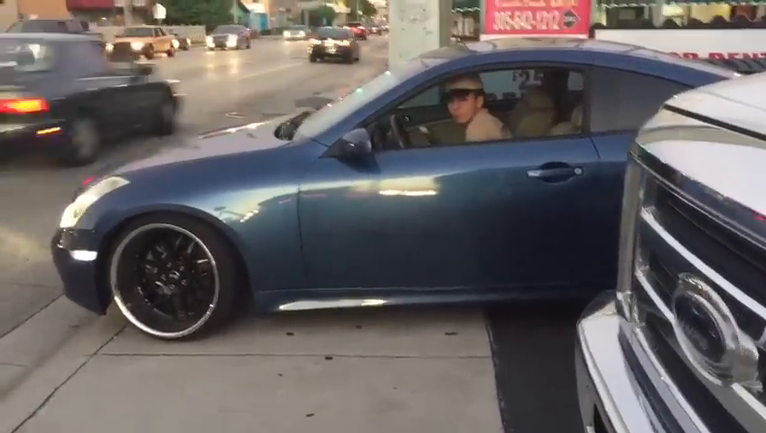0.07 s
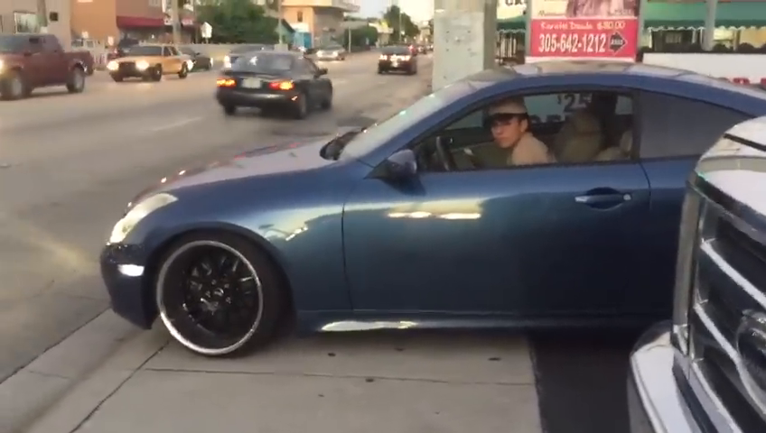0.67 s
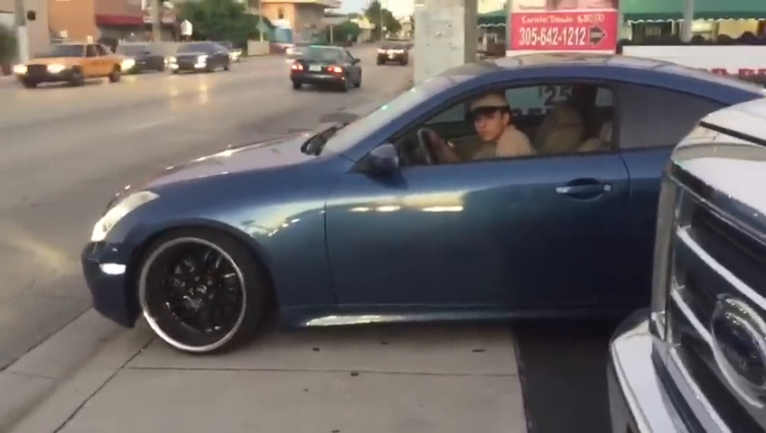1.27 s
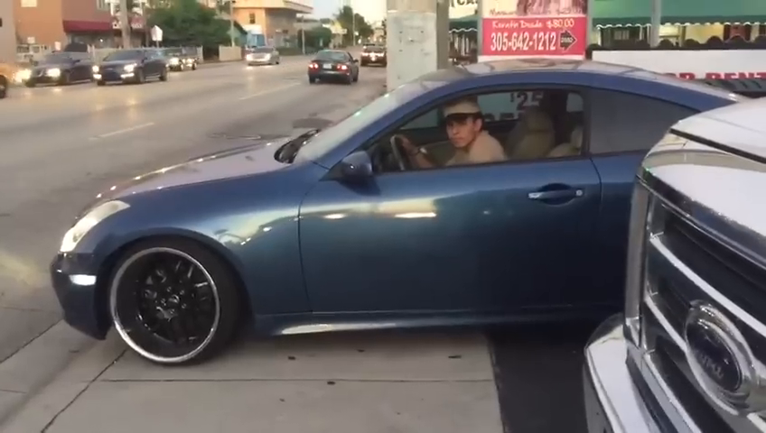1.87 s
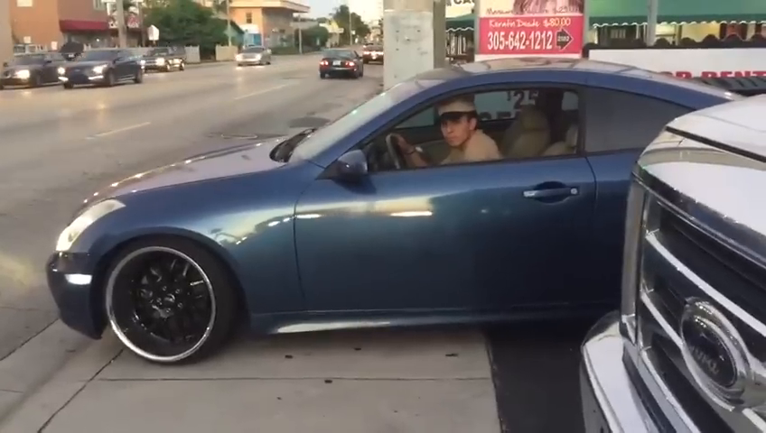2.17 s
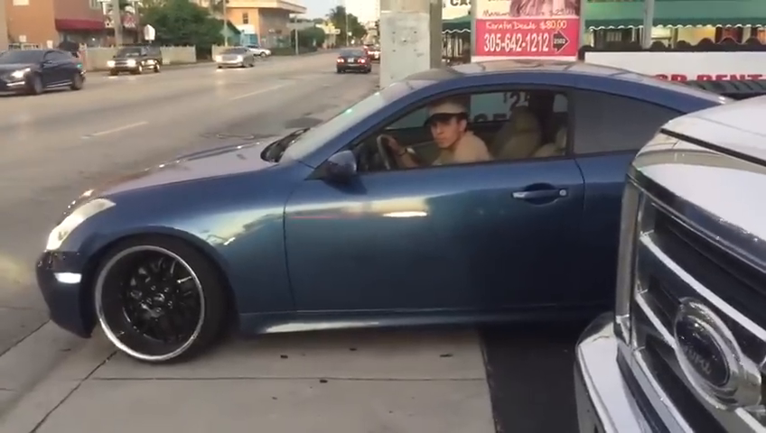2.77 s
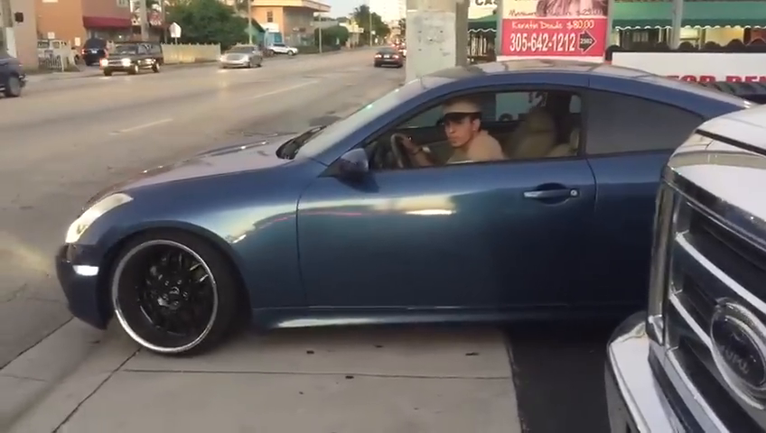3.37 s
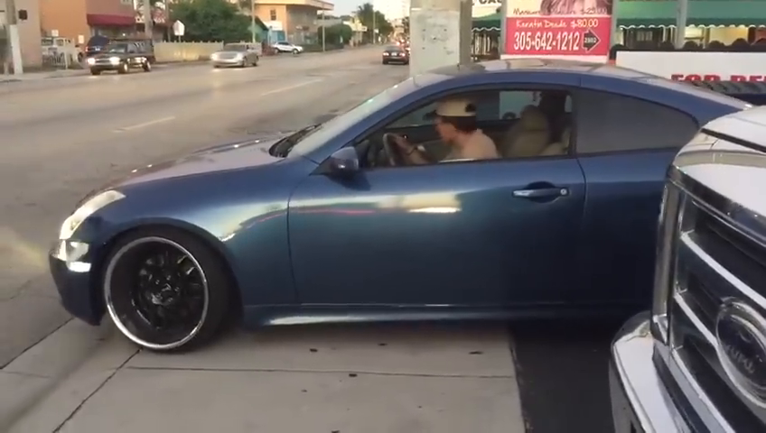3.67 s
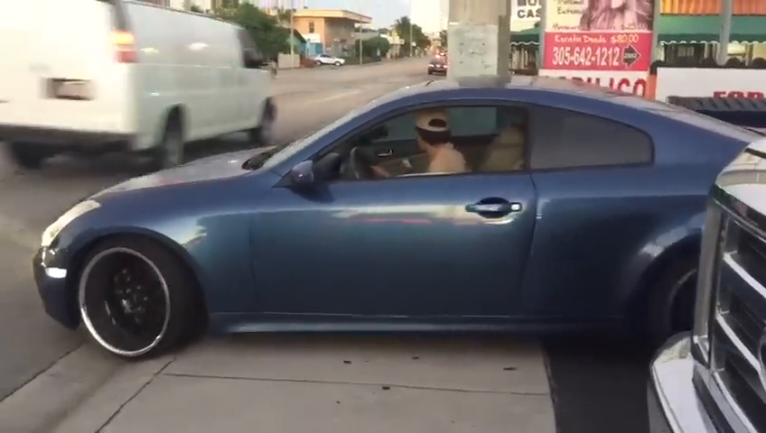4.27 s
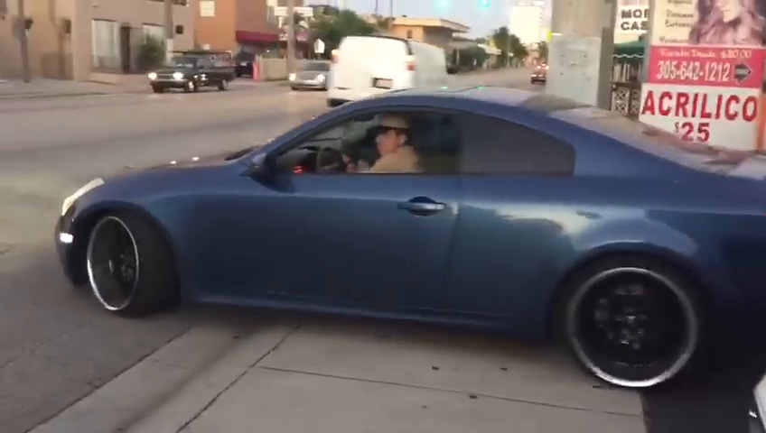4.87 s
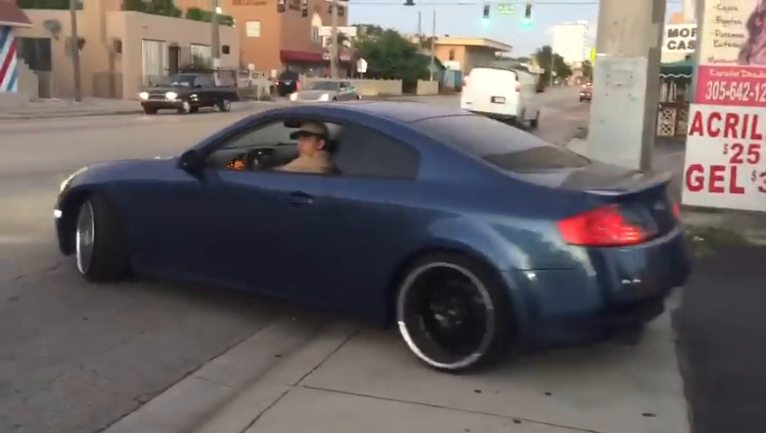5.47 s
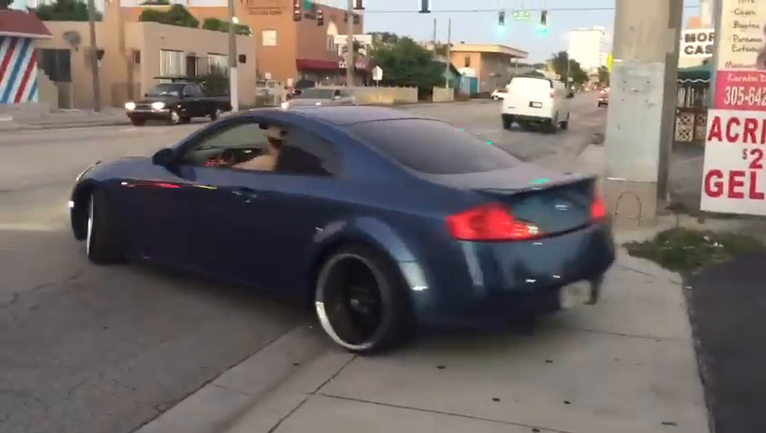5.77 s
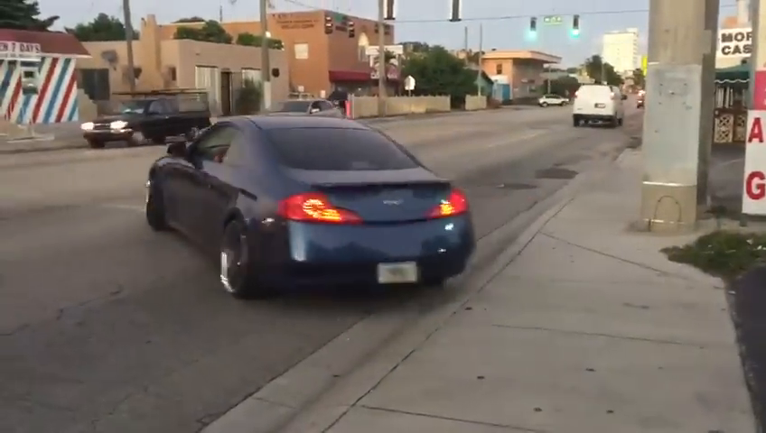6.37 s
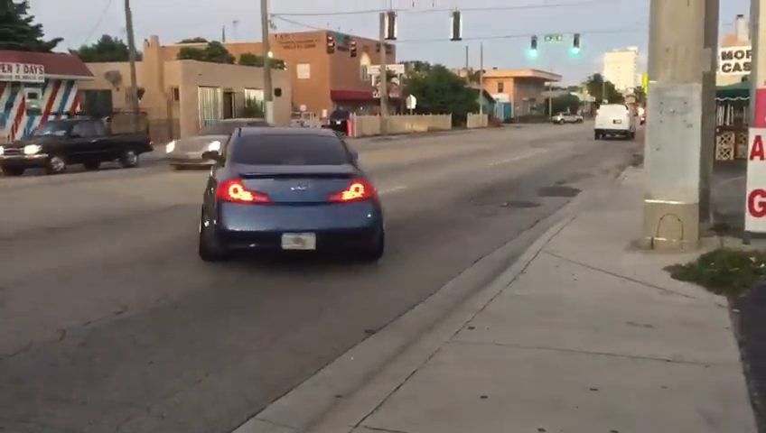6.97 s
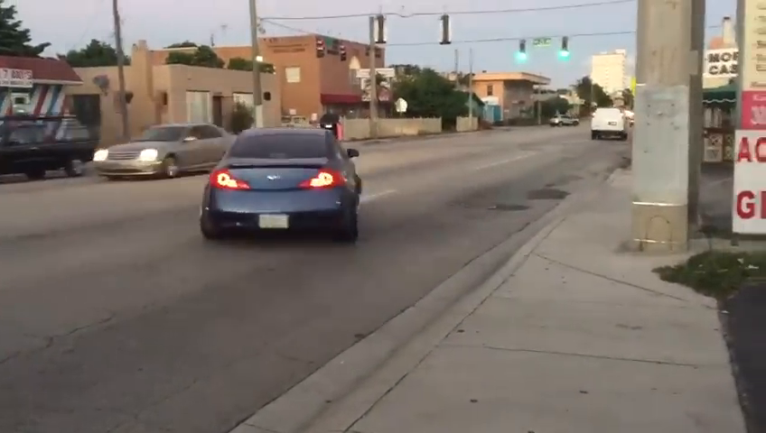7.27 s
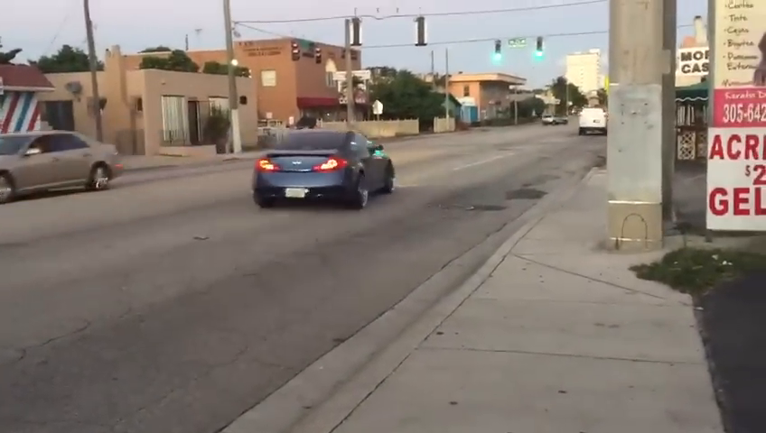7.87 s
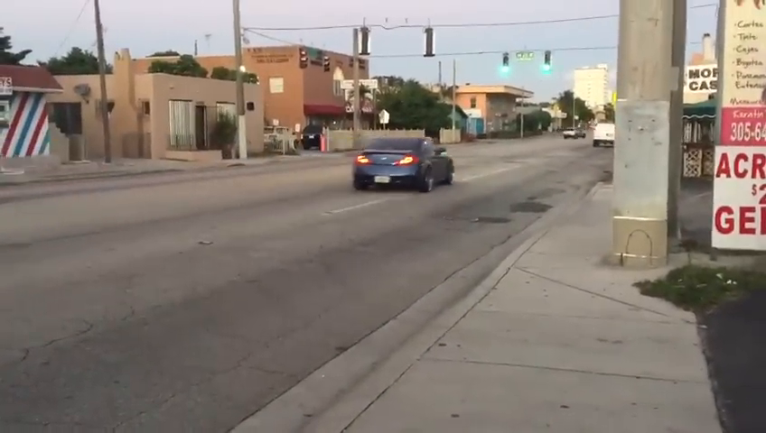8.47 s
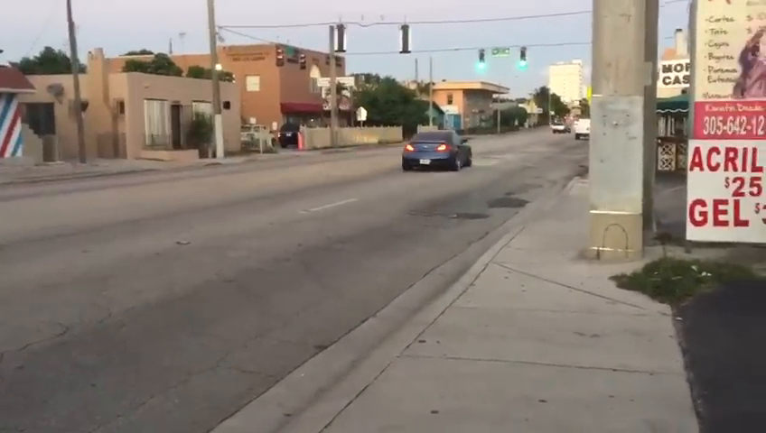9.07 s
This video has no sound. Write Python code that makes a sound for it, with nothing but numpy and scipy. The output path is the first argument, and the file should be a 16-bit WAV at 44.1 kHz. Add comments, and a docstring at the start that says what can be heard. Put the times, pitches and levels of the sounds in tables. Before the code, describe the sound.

A coupe idles low amid passing traffic, revs twice, then pulls away with a loud raspy exhaust roar and short tyre chirps.

```python
"""At the kerb of a busy street, a six-cylinder coupe with a sports exhaust idles as a car and a van pass.
It creeps out on two blips of the throttle, loose metal jingles, and it pulls away hard with chirping tyres.
Each firing of a cylinder sends one pulse down the exhaust; together the pulses make a deep drone.
Under load they steepen into shocks (sudden jumps in pressure) that rasp and echo off the house fronts."""
import sys
import numpy as np
from scipy import signal
from scipy.fft import rfft, irfft
from scipy.io import wavfile
from scipy.ndimage import uniform_filter1d, map_coordinates

SR = 44100
rng = np.random.default_rng(int(sys.argv[2]) if len(sys.argv) > 2 else 0)


def dump(signal):
    """Clip the signal to [-1, 1] and save it as 16-bit WAV at the path in sys.argv[1]."""
    limited = np.clip(np.atleast_2d(signal).T, -1, 1)
    pcm = np.round(limited * 32767).astype(np.int16)
    wavfile.write(sys.argv[1], SR, pcm)


N = 406161
TIME = np.arange(N) / SR
LEAVES_S, DRIFT_HZ = 6.58, 8.5  # when the car starts to draw away; how fast the drone's level drifts

# the six unequal cylinders, in the order they fire: pulse strength/dB, shock strength/dB
CYLINDERS = [(1.5, 5.5), (-1.5, -4), (0.8, -4), (-1, -10), (1.5, -7), (-1, 2.5)]
# engine speed: t/s, firing rate/Hz
SPEED = [(0.0, 46.5), (2.33, 46.7), (2.9, 45.3), (3.58, 47.3), (4.06, 47.7), (4.39, 83.2), (4.65, 87.6),
         (4.83, 109.1), (5.0, 107.0), (5.2, 92.9), (5.45, 115.1), (5.82, 86.3), (6.13, 67.0), (6.32, 74.1),
         (6.61, 115.8), (6.82, 138.4), (7.0, 148.2), (7.33, 141.3), (8.02, 198.3), (8.29, 205.7),
         (8.41, 214.8), (8.66, 224.4), (8.9, 247.7), (9.21, 270.3)]
# the idle, which weakens a little before the car moves: t/s, drone level/dB, burble level/dB
IDLE = [(0,-21.5,-28),(1.5,-18.5,-24.5),(2.6,-19,-23),(3.05,-22,-24),(3.9,-20.5,-29.5)]
# how hard the engine works (two blips, a dip as the clutch bites, then the pull): t/s, level/dB
THROTTLE = [(4.0,-16.5),(4.26,-10),(4.4,-7.5),(4.52,-13.5),(4.69,-6),(4.79,-7),(4.84,-16),(4.96,-20),(5.14,-19.5),(5.27,-4.5),(5.45,-10),(5.64,-21.5),(5.76,-11.5),(5.9,-13.5),(6.15,-13.5),(6.48,-4),(6.62,-5),(6.85,-5),(7.34,-4),(7.6,0),(7.9,1.5),(8.3,2),(8.45,0.5),(8.8,3),(8.98,7),(9.2,3.5)]
# pulling away: t/s, bark strength/dB, shock strength/dB
PULL = [(6.3, -36, -53), (6.43, -29, -52), (6.7, -17, -81), (6.87, -17, -57), (7.0, -21, -57.5),
        (7.3, -17, -49), (7.5, -18.5, -44.5), (7.8, -11.5, -32.5), (8.1, -11.5, -31), (8.45, -18, -38.5),
        (8.68, -16.5, -39), (8.82, -22.5, -41), (8.97, -19, -39.5), (9.21, -19.5, -57)]


def amp(db):
    """Turns decibels into a gain."""
    return 10 ** (np.asarray(db) / 20)


def unit(x):
    """Scales a signal to an average size (rms) of 1."""
    return x / np.sqrt(np.mean(x ** 2) + 1e-20)


def steady(x, size=4000):
    """Evens out a signal's level, so that a level curve alone sets its loudness."""
    power = uniform_filter1d(uniform_filter1d(x ** 2, size), size)
    return x / np.sqrt(abs(power) + 1e-14)


def curves(rows):
    """Joins a table's rows with straight lines: one curve for each column after the time."""
    s, *columns = np.transpose(rows)
    return [np.interp(TIME, s, c) for c in columns]


def read(points, hz):
    """Looks up a frequency in a table, on a logarithmic scale."""
    f, value = np.transpose(points)
    return np.interp(np.log(hz + 1), np.log(f + 1), value)


def colour(x, points, size=4096):
    """Shapes bass and treble to a table of f/Hz, level/dB, with a filter that never rings ahead of time."""
    log_gain = np.log(amp(read(points, abs(np.fft.fftfreq(size, 1 / SR)))))
    taps = np.fft.ifft(np.exp(np.conj(signal.hilbert(log_gain)))).real
    return signal.oaconvolve(x, taps)[:N]


def muffle(x, hz, order):
    """Turns down everything above hz; a higher order cuts more steeply."""
    return signal.sosfiltfilt(signal.butter(order, hz, fs=SR, output="sos"), x)


def wander(hz):
    """A smooth random wobble, with little in it faster than hz."""
    slow = np.exp(-(np.fft.rfftfreq(N, 1 / SR) / hz) ** 2)
    return unit(irfft(rfft(rng.standard_normal(N)) * slow, N))


def clicks(at, strength):
    """Sharp clicks at positions that may fall between samples."""
    index = np.floor(at).astype(int)[:, None] + np.arange(-7, 9)
    offset = index - at[:, None]
    shape = np.sinc(offset) * np.sinc(offset / 8)
    return np.bincount(np.clip(index, 0, N - 1).ravel(), (shape * strength[:, None]).ravel(), N)


def ring_out(x, seconds):
    """Gives each click a fading tail."""
    return signal.lfilter([1], [1, -np.exp(-1 / (seconds * SR))], x)


def delayed(x, seconds):
    """An echo whose delay changes from moment to moment."""
    return map_coordinates(x, [np.arange(N) - seconds * SR], order=3)


def firings(fired, jitter_s=.00001, valve_lag=0.081):
    """The cylinders fire in turn: each pulse's sample position, usual strength, random extra, shock dB."""
    # firing evens out with speed: firing rate/Hz, random spread of strength (0-1)
    uneven = [(47, 0.12), (90, 0.09), (140, 0.11), (260, 0.05)]
    firing = np.arange(1, int(fired[-1]))
    luck, late = rng.standard_normal((len(firing), 2)).T
    strength_db, shock_db = np.array(CYLINDERS)[firing % len(CYLINDERS)].T
    at = np.interp(firing + valve_lag, fired, np.arange(N))
    # every other pulse comes late from the second row of cylinders, more so when much gas flows
    row_lag_s = np.interp(at / SR, [7.3, 7.8], [.00012, .00025])
    at = at + SR * (row_lag_s * (.5 - firing % 2) + jitter_s * late)
    chance = read(uneven, np.interp(at, np.arange(N), curves(SPEED)[0])) * luck
    return at, amp(strength_db) / amp(strength_db).mean(), chance, shock_db


def harmonic(fired, k, smear, lag=0.13):
    """A tone at k times the firing rate; the silencer delays each differently, so thumps become a mutter."""
    return -np.sqrt(2) * np.cos(2 * np.pi * (k * (fired - lag) - smear * k ** 2 / 2))


def idle(fired, smear=0.2755, lope_db=3.5, lope_lag=0.096, drift_db=2):
    """The idle lopes: odd and even harmonics swell in turn, once per round of the six cylinders."""
    # harmonics 1 to 6 of the firing rate: level/dB
    harmonics_db = [-34, -10, -3.5, -6.5, -46, -23]
    lope = lope_db * np.cos(2 * np.pi * (fired / len(CYLINDERS) - lope_lag))
    tone = sum(amp(db + (-1) ** k * lope) * harmonic(fired, k, smear)
               for k, db in enumerate(harmonics_db, 1))
    return amp(curves(IDLE)[0] + drift_db * wander(DRIFT_HZ)) * tone


def drone(fired, at, chance, throb=0.94):
    """The engine's deep note, idling and then driving, throbs with the strength of each firing."""
    tone = (1 - moving()) * idle(fired) + moving() * driving(fired)
    return tone * (1 + throb * np.interp(np.arange(N), at, chance))


def pipe(x):
    """The exhaust pipe rings at a few low notes; each filter runs twice for a steeper cut."""
    # the pipe's notes: f/Hz, width/Hz, level/dB
    notes = [(132.4,39.7,1.5),(189,37,4),(280.7,14.7,10),(338,31,-27.5)]
    out = np.zeros(N)
    for hz, width, db in notes:
        b, a = signal.iirpeak(hz, hz / (2 * width), SR)
        out += amp(db) * signal.lfilter(b, a, signal.lfilter(b, a, x))
    return out


def burble(at, strength, chance):
    """Differences from one firing to the next set the pipe ringing; at idle the pulses are rounder."""
    hard = pipe(clicks(at, strength - strength.mean() + 2.2 * chance))
    soft = muffle(hard, hz=180, order=1)
    smooth_db = np.interp(curves(SPEED)[0], [120, 138.6], [0, -16.5])  # a fast engine burbles less
    driving_db = -12 + 0.95 * curves(THROTTLE)[0] + smooth_db + distance_db()
    idle_db, under_way = curves(IDLE)[1], moving()
    level = amp(idle_db + under_way * (driving_db - idle_db))
    return level * steady(soft + under_way * (hard - soft), size=8000)


def traffic(rumble_db=-36, patch_db=1.2):
    """The tyres of passing cars roar and hiss in drifting patches, over the rumble of the street."""
    # cars going by: t/s, roar level/dB, hiss level/dB
    passing = [(0,-28.5,-46),(.43,-31,-47.5),(2.1,-31,-46),(3,-28.5,-46.5),(3.52,-28,-40.5),(3.95,-30.5,-40),(4.5,-33.5,-43),(4.9,-37.5,-44),(5.6,-37.5,-44),(6.1,-35.5,-51.5),(9.2,-57,-55)]
    # tone of tyres on the road: f/Hz, level/dB
    road_tone = [(200,-11.5),(450,-6.5),(800,-2),(1600,-3),(2300,-10.5),(2900,-12),(3900,-18),(4400,-17.5),(5000,-20.5),(6200,-22),(7600,-27.5),(9700,-29),(11000,-45.5)]
    # tone of the rumble: f/Hz, level/dB
    rumble_tone = [(20,-23.5),(45,-8.5),(75,-4.5),(150,-0.5),(300,-6.5),(450,-12),(700,-14.5),(2000,-78)]
    roar_db, hiss_db = curves(passing)
    bands = signal.stft(colour(rng.standard_normal(N), road_tone), nperseg=1024)[2]
    patches = uniform_filter1d(rng.standard_normal(bands.shape), size=9, axis=0)  # blurred in pitch
    patches = unit(uniform_filter1d(patches, size=8, axis=1))  # and in time
    wash = signal.istft(bands * amp(patch_db * patches), nperseg=1024)[1][:N]
    roar = muffle(wash, hz=3200, order=2)
    rumble = unit(colour(rng.standard_normal(N), rumble_tone))
    rumble *= amp(rumble_db + 0.8 * (roar_db - roar_db.mean()))
    return amp(roar_db - 1.67) * unit(roar) + amp(hiss_db - 2.5) * unit(wash - roar) + rumble


def van(engine_db=6.5):
    """A van's tyre noise and low engine noise swell and fade as it goes by."""
    # its passing: t/s, level/dB
    passing = [(0,-68),(2.7,-55),(3.2,-34.5),(3.7,-28.5),(4.1,-29),(4.6,-43),(5.5,-66)]
    # tone of its tyre tread: f/Hz, level/dB
    tread_tone = [(400,-38.5),(620,-12),(790,7.5),(950,3.5),(1200,1.5),(2500,-12),(6000,-50.5)]
    # tone of its engine: f/Hz, level/dB
    engine_tone = [(20,-31.5),(45,-7),(70,-1),(110,-1.5),(220,-2.5),(330,-34.5),(1000,-55.5)]
    tread = unit(colour(rng.standard_normal(N), tread_tone))
    engine = unit(colour(rng.standard_normal(N), engine_tone))
    return amp(curves(passing)[0]) * (tread + amp(engine_db) * engine)


def moving():
    """Goes from 0 at idle to 1 under way."""
    # start and end of the changeover: t/s
    idle_ends = [3.98, 4.05]
    return np.interp(TIME, idle_ends, [0, 1])


def distance_db(db_per_s=4.5):
    """How far the deep engine sound has faded as the car draws away."""
    return -db_per_s * np.maximum(TIME - LEAVES_S, 0)


def driving(fired, smear=0.14, waver_db=1.62):
    """Each harmonic follows the throttle, and swells as it sweeps through a note the silencer rings at."""
    # harmonics 1 to 4: level/dB, dB gained per dB of throttle
    harmonics = [(1, 1.24), (7, 1.12), (0.74, 0.64), (4.5, 1.85)]
    # what the silencer lets through: f/Hz, level/dB
    silencer = [(49.0, -26), (68.0, -10.7), (87.0, -1.5), (100.0, -13), (127.0, -5), (165.0, -17.5),
                (195.0, -16), (215.0, -14.5), (251.0, -21.5), (288.0, -10), (340.0, -32), (381.0, -20),
                (445.0, -34.5), (548.0, -19.5), (798.0, -24.3), (1003.0, -41)]
    firing_hz, throttle_db = curves(SPEED)[0], curves(THROTTLE)[0]
    tone = np.zeros(N)
    for k, (db, slope) in enumerate(harmonics, 1):
        level_db = db + slope * throttle_db + read(silencer, k * firing_hz) + waver_db * wander(DRIFT_HZ)
        tone += amp(level_db) * harmonic(fired, k, smear)
    return amp(distance_db()) * tone


def bursts():
    """Gain of the gruff bursts of gas that swell and die away at the top of each stab of throttle."""
    # the bursts: peak t/s, rise/s, fall/s, level/dB
    stabs = [(4.7, 0.076, 0.056, -34), (5.31, 0.094, 0.057, -29.5), (6.451, 0.16, 0.044, -23)]
    return sum(amp(db) * np.exp(np.minimum((TIME - s) / rise_s, (s - TIME) / fall_s))
               for s, rise_s, fall_s, db in stabs)


def bark(fired, at, strength, chance, shock_db, burst_db=-5.5, pull_db=-6.0):
    """Harmonics above the drone bark in the bursts and the pull; unequal cylinders make them growl."""
    # tone of the bark: f/Hz, level/dB
    tone = [(150,-72.5),(330,-1.5),(450,-12),(580,3),(740,0.5),(980,-2),(1150,-8.5),(1500,-12),(1900,-18),(3000,-18.5),(6000,-61.5)]
    # the note clears with speed: firing rate/Hz, share of the cylinders' shock differences (0-1)
    lopsided = [(70, .6), (145, .4), (185, .1)]
    ragged = np.interp(at / SR, [6.6, 6.85], [.35, .06])  # pulses vary more until the clutch bites
    firing_hz = np.interp(at, np.arange(N), curves(SPEED)[0])
    regular = strength * amp(read(lopsided, firing_hz) * shock_db)
    pulses = clicks(at, regular / regular.mean() + chance + ragged * rng.standard_normal(len(at)))
    # harmonics 1 to 4 belong to the drone: line them up with the pulses and take them out
    aligned = fired - np.interp(at[0], np.arange(N), fired) % 1
    lowest = np.gradient(fired) * (1 + 2 * sum(np.cos(2 * np.pi * k * aligned) for k in range(1, 5)))
    level = amp(burst_db) * bursts() + pulling() * amp(curves(PULL)[0] + pull_db)
    return level * steady(colour(pulses - lowest, tone))


def rush(fired, between=0.1, gusty_db=2.5, lopsided=0.39, pull_db=-18.5):
    """Gas leaves the pipes in gusts, one per firing, strongest from the hardest cylinders."""
    # tone of the rushing gas: f/Hz, level/dB
    tone = [(150,-28.5),(430,14.5),(650,2.5),(950,13),(1200,-0.5),(1900,-7.5),(3100,-5),(4200,-12.5),(5000,-25),(6500,-18.5),(10000,-40)]
    shock_db = np.array(CYLINDERS)[fired.astype(int) % len(CYLINDERS), 1]
    flow = between + np.exp(-(fired % 1) / 0.24)
    gusts = flow * amp(lopsided * shock_db + gusty_db * wander(54)) * rng.standard_normal(N)
    level = bursts() + pulling() * amp(curves(PULL)[0] + pull_db)
    return level * steady(tailpipe(colour(gusts, tone)))


def tailpipe(x):
    """Sound bouncing across the pipe ends adds a metallic ring."""
    # the pipe ends' notes: f/Hz, width/Hz, level/dB
    notes = [(2440,83,1.5),(2960,420,-10),(3460,250,-5.5),(4540,270,-23),(5190,280,-4.5),(5850,230,-4),(7130,190,-3),(8870,500,-4)]
    return x + sum(amp(db) * signal.lfilter(*signal.iirpeak(hz, hz / width, SR), x)
                   for hz, width, db in notes)


def street(x, near_db=-18, far_db=-8, bounce_db=-18, glide_per_s=-.045):
    """The street returns single echoes and a blurred tail, which gains on the direct sound with distance."""
    # echoes off the kerb and house fronts: delay/s, level/dB
    walls = [(.0014,-20),(.013,-12),(.047,-6),(.083,-19.5)]
    # how long the tail lasts: f/Hz, time to fade by 60 dB/s
    decay = [(100,0.76),(1000,1),(4000,0.22),(10000,0.17)]
    # the bounce off the road comes ever sooner as the car draws away: t/s, delay/s
    bounce = [(6.2,0.00041),(6.95,0.00024),(9.2,0.000073)]
    taps = rng.choice([-1., 1.], SR) * (rng.random(SR) < 2000 / SR)  # about 2000 tiny echoes in a second
    hz, t, bands = signal.stft(taps, SR, nperseg=256)
    tail = signal.istft(bands * amp(-60 * t / read(decay, hz)[:, None]), SR, nperseg=256)[1]
    wet = amp(np.interp(TIME, [7.4, 9.0], [near_db, far_db]))
    glide = 1 + glide_per_s * np.maximum(TIME - LEAVES_S, 0)
    x = (x + amp(bounce_db) * delayed(x, curves(bounce)[0])) / np.hypot(1, amp(bounce_db))
    echoes = sum(amp(db) * delayed(x, s * glide) for s, db in walls)
    blur = signal.oaconvolve(x, tail / np.linalg.norm(tail))[:N]
    return (x + echoes + wet * blur) / np.sqrt(1 + wet ** 2)


def pulling():
    """Goes from 0 to 1 as the engine takes the load."""
    # start and end of the shocks' build-up: t/s
    shocks_form = [6.03, 6.56]
    return np.interp(TIME, shocks_form, [0, 1]) ** 2


def rasp(at, shock_db, spread_db=4.0, rebound_s=0.0031, rebound_share=0.93, puff_share=.6):
    """Under load each pulse steepens into a shock that rebounds in the pipe and trails a puff of gas."""
    # tone of the shocks: f/Hz, level/dB
    tone = [(300,-53),(900,15),(1600,4.5),(2100,1),(2700,4),(4000,-2.5),(5600,-7.5),(7400,-16),(8200,-18),(9600,-19),(11000,-32)]
    shocks = clicks(at, amp(shock_db + spread_db * np.clip(rng.standard_normal(len(at)), -2, 1.5)))
    pipe_echo = rng.standard_normal(SR // 100) * np.exp(-TIME[:SR // 100] / rebound_s)
    rebounds = signal.oaconvolve(shocks, pipe_echo)[:N]
    puffs = ring_out(shocks, seconds=.0012) * rng.standard_normal(N)
    sound = tailpipe(colour(unit(shocks) + rebound_share * unit(rebounds) + puff_share * unit(puffs), tone))
    body = muffle(sound, hz=6000, order=3)
    # the sizzle on top grows much faster than the body of the rasp
    steep_db = curves(PULL)[1]
    sizzle = amp(steep_db) * steady(sound - body)
    return pulling() * (amp(-12.5 + 0.34 * steep_db) * steady(body) + sizzle)


def jingle(notes=24, hits_per_s=9, ring_s=0.0058, spread=0.19):
    """Thin, loose metal jingles as the car leaves the kerb: many notes, each struck at random moments."""
    # the jingling: t/s, level/dB, centre f/Hz
    shaking = [(6.05,-59,3500),(6.22,-43,3300),(6.45,-46,3700),(6.62,-43.5,3580),(6.75,-44,2350),(6.86,-57,2330),(7,-65,2330)]
    level_db, centre_hz = curves(shaking)
    phase = 2 * np.pi * np.cumsum(centre_hz) / SR
    heard = slice(round(shaking[0][0] * SR), round(shaking[-1][0] * SR))
    out = np.zeros(N)
    for ratio in np.exp(spread * rng.standard_normal(notes).clip(-2, 2)):
        hits = (rng.random(N) < hits_per_s / SR)[heard]
        out[heard] += ring_out(hits * 1., ring_s) * np.sin(ratio * phase[heard])
    return amp(level_db) * steady(out)


def tyres(waver=0.025, overtone_db=-17, flutter_db=3.5):
    """A rear tyre slips in short, wavering squeals."""
    # the squeals: t/s, length/s, start f/Hz, end f/Hz, level/dB
    chirps = [(7.035,0.062,1550,1515,-33.5),(7.088,0.12,1490,1479,-23),(7.17,0.081,1487,1425,-16.5),(7.262,0.051,1356,1427,-23),(7.396,0.034,1526,1220,-24),(7.688,0.03,1402,1220,-13.5),(7.812,0.049,1357,1455,-16.5),(7.949,0.14,1403,1343,-25)]
    out, wobble, flutter = np.zeros(N), wander(160), amp(flutter_db * wander(220))
    for s, length, start_hz, end_hz, db in chirps:
        span = slice(round(s * SR), round((s + length) * SR))
        count = len(out[span])
        hz = np.linspace(start_hz, end_hz, count) * (1 + waver * wobble[span])
        phase = 2 * np.pi * np.cumsum(hz) / SR
        squeal = np.sin(phase) + amp(overtone_db) * np.sin(2 * phase)
        out[span] += amp(db) * squeal * flutter[span] * signal.windows.tukey(count, .7)
    return out


def scene():
    """The coupe and the traffic around it; only the coupe's brighter sounds echo in the street."""
    fired = np.cumsum(curves(SPEED)[0]) / SR  # running count of firings
    at, strength, chance, shock_db = firings(fired)
    deep = drone(fired, at, chance) + burble(at, strength, chance)
    bright = bark(fired, at, strength, chance, shock_db) + rasp(at, shock_db) + rush(fired)
    return (deep + street(bright + tyres() + jingle()) + traffic() + van())[None]


def record(dry):
    """Flattens the loudest peaks, then cuts the treble above 10500 Hz."""
    treble_cut = signal.firwin(255, 10500, window=("kaiser", 9), fs=SR)
    return signal.oaconvolve(np.clip(dry, -.95, .95), treble_cut[None], "same")


dry = scene()
out = record(dry)
dump(out)
```